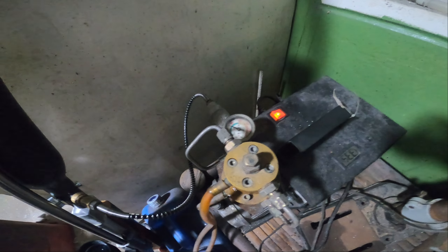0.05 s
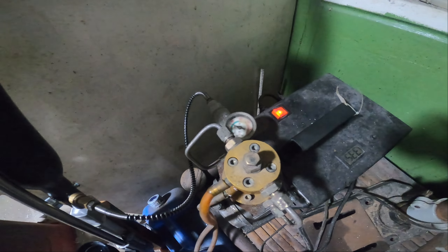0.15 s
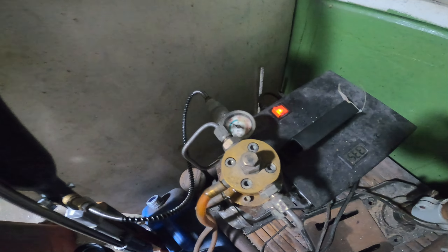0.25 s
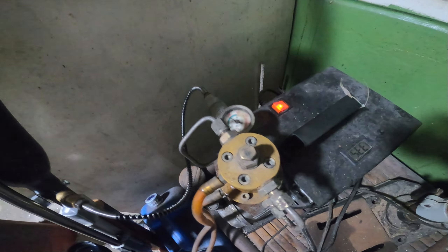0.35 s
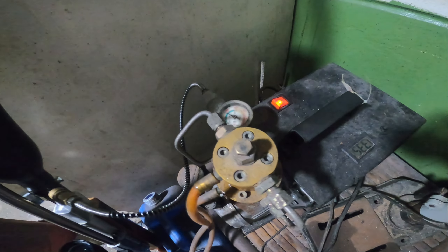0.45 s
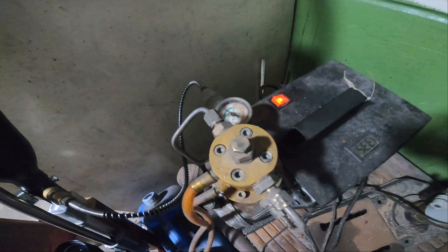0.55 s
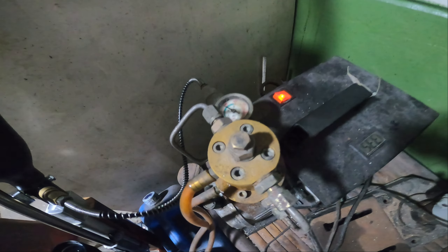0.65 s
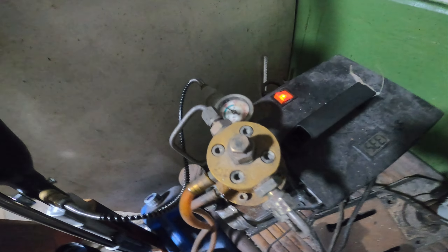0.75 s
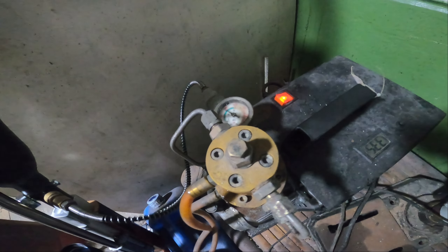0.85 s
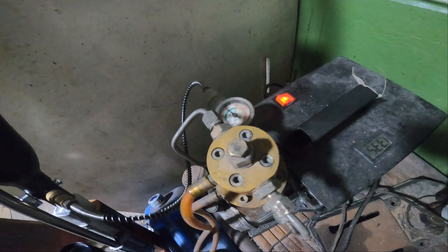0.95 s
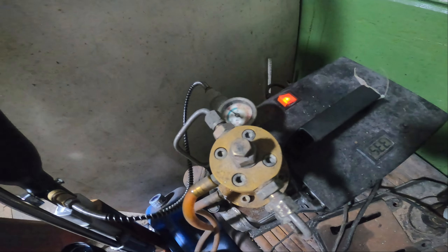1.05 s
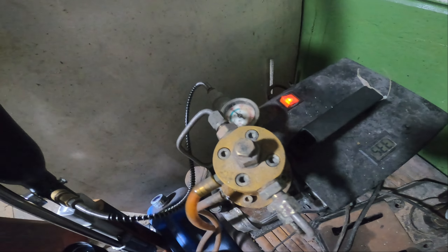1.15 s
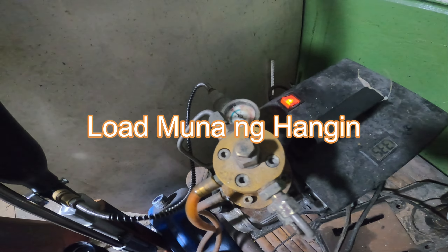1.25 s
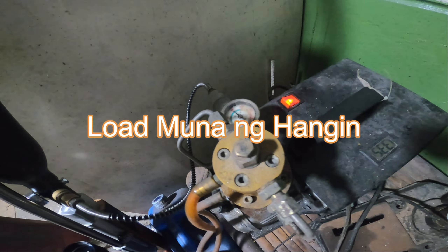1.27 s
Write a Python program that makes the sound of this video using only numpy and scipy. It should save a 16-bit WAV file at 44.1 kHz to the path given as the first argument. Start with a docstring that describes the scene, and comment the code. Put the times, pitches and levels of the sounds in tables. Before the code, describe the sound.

A small high-pressure piston compressor runs steadily up close, a loud droning low hum with rapid mechanical rattle, buzzing and hissing air.

```python
"""A small high-pressure piston compressor pumps steadily, heard from close above in a room corner.
From the start each crank turn gives one air pulse that booms on the fifth harmonic and throbs a little.
A motor hums under it, and every turn brings the same round of piston and valve knocks and hissing air.
Metal parts on the head sing up and fade, some at once and others later, as the pressure builds.
The turning sags slightly and partly recovers; from 4.4 s the boom thins out and leans further right."""
import sys
import numpy as np
from scipy import signal
from scipy.fft import rfft, irfft
from scipy.io import wavfile
from scipy.ndimage import uniform_filter1d, map_coordinates

SR = 44100
rng = np.random.default_rng(int(sys.argv[2]) if len(sys.argv) > 2 else 0)


def transcribe(signal):
    """Save signal, clipped to [-1, 1], as a 16-bit WAV file at the path in sys.argv[1]."""
    frames = np.atleast_2d(signal).T
    limited = np.clip(frames, -1, 1)
    pcm = np.round(limited * 32767).astype(np.int16)
    wavfile.write(sys.argv[1], SR, pcm)


N = 272538
TIME = np.arange(N) / SR   # seconds

# crank speed: time_s, turns_per_s
CRANK_SPEED = [(0.0, 55.374), (0.6, 55.289), (1.2, 55.159), (1.8, 55.025), (2.4, 54.982), (2.9, 54.829),
               (3.4, 54.896), (4.1, 55.079), (5.0, 55.076), (6.18, 55.113)]
# boom, one row per crank harmonic from the first:
# start_db, creep_db_per_s, change_db as the boom gives way, throb_depth (0-1), throb_fade_s
BOOM_HARMONICS = [(-33.5, 0.24, 1.5, 0.03, 1), (-27.5, 0.11, -4.5, 0, 1), (-31, 0.46, 0.5, 0.5, 1.5),
                  (-24, -0.17, -4.5, 0.29, 5), (-13, -0.41, -5.5, 0, 1), (-31.5, 1.19, 1.5, 0.03, 1)]
# buzz of the casing: crank_harmonic, level_db
CASING_BUZZ = [(7, -45.5), (8, -36.5), (9, -31), (10, -34.5), (11, -34), (12, -46), (13, -47.5),
               (14, -37.5), (15, -58), (16, -43.5), (17, -42.5), (18, -38), (19, -39), (20, -41.5),
               (21, -46.5), (22, -34.5), (23, -38.5), (24, -38), (25, -37), (26, -36), (27, -41.5),
               (28, -43.5), (29, -42), (30, -51.5), (31, -39.5), (32, -43), (33, -39), (34, -40.5),
               (35, -43), (36, -58.5), (37, -40.5), (38, -41.5), (39, -44.5), (40, -41.5), (41, -45),
               (42, -42.5), (43, -46.5)]
# piston and valve contacts in one turn: share_of_turn, relative level_db, centre_hz, ring_s
CONTACT_POINTS = [(0.049, -4, 1500, 0.0037), (0.271, 2, 494, 0.004), (0.281, -2.5, 4170, 0.001099),
                  (0.431, 1, 1000, 0.0043), (0.548, -8, 4370, 0.0014), (0.681, -2, 2580, 0.0022),
                  (.935, 7.5, 2235, 0.00058), (0.929, -3, 7470, 0.0017)]
# singing metal parts: pitch_hz, width_hz, loudest_s, swell_s, level_db at the loudest
METAL_RINGS = [(1320, 56, 0.12, 0.77, -29.5), (2475, 36, 6.8, 1.2, -38.5), (2650, 160, 5.2, 0.52, -34.5),
               (3070, 20, .2, 0.33, -36.5), (3168, 35, 3, 2.2, -40.5), (4024, 26, 5.3, 1.6, -40.5),
               (4820, 42, 2.3, 0.61, -41.5), (4870, 45, 5.6, 1.8, -47.5), (5830, 110, 1.1, .5, -50)]
# colour of the rattle and rushing air: band_hz, relative level_db
AIR_COLOUR = [(25, -16), (80, -11), (160, -4.5), (290, 0.5), (420, -4.5), (780, -11.5), (1170, 1.5),
              (1550, -3.5), (2250, -3.5), (3200, -12.5), (4600, -13), (6000, -14), (7100, -15),
              (8900, -30.5), (13000, -39.5)]
# left-right likeness of the rattle and air: band_hz, likeness (1 = the same on both sides)
SIDE_LIKENESS = [(250, 0.97), (550, 1), (1000, .92), (2000, 0.76), (3300, 0.84), (4700, 0.84), (6600, .33),
                 (10000, 0.13)]
# balance of all but the boom and motor: band_hz, left_minus_right_db
SIDE_BALANCE = [(60, -6), (250, 4.5), (560, -2.5), (900, -2.5), (1400, -1.5), (2200, -1), (3300, -0.5),
                (5600, -6), (7600, -1.5), (12000, -1)]
# swing of the knocks, heard relative to its mean: time_s, level_db
KNOCK_LEVEL = [(0.1, -24), (0.52, -23), (2.42, -26.5), (2.89, -24), (4.04, -24.5), (6.02, -24),
               (6.1, -22.5)]
# how the registers of the mechanism swell: centre_hz, rise_db_per_s, share of the knocks' swing
REGISTER_SWELL = [(250, 0.5, 0.77), (520, 0.43, -0.47), (1200, 0.1, 1.4), (2200, 0.05, 0.68),
                  (5000, 0.19, -0.064)]

GIVES_WAY_S, GIVES_WAY_LENGTH_S = 4.4, 1.57   # the boom thins out as the pressure builds
THROB_HZ, THROB_DIP_S = 2.71, 0.37
# boom balance, left minus right: it creeps right, and further as it thins out
BOOM_PAN_DB, BOOM_PAN_DB_PER_S, BOOM_PAN_SHIFT_DB = -2, -0.17, -2
ECHO_LATEST_S, ECHO_DB = 0.006, -13   # echoes off the corner walls and the casing, level of each
LEFT_LAG_S = 0.000045
CUTOFF_HZ = 14500
HALF_EACH_SIDE = np.array([[0.5], [-0.5]])   # shares a balance in dB between left and right


def from_db(db):
    """Decibels to gain."""
    return 10 ** (np.asarray(db) / 20)


def rms_one(x):
    """Scale to unit power."""
    return x / np.sqrt(np.mean(x ** 2) + 1e-20)


def in_time(rows):
    """Each column of a curve at every sample."""
    time_s, *columns = np.transpose(rows)
    return [np.interp(TIME, time_s, column) for column in columns]


def at_hz(points, hz):
    """Read a spectrum on a log-frequency axis."""
    point_hz, values = np.transpose(points)
    return np.interp(np.log(hz), np.log(point_hz), values)


def drift(rate_hz, hop=200, settle=2000):
    """Smooth random wander of spread 1 that changes about rate_hz times a second."""
    pole = np.exp(-2 * np.pi * rate_hz * hop / SR)
    noise = rng.standard_normal(N // hop + settle + 2)
    slow = signal.lfilter([1], [1, -2 * pole, pole * pole], noise)[settle:]
    return np.interp(np.arange(N) / hop, np.arange(len(slow)), rms_one(slow))


def panned(hz):
    """Left and right gain at this frequency."""
    return from_db(at_hz(SIDE_BALANCE, hz) * HALF_EACH_SIDE)


def boom(turn, speed, pulse_at=-0.012, intake_hz=160, intake_q=4.9, cavity_hz=305, cavity_q=7.5):
    """One air pulse a turn: low harmonics, delayed by two air resonances; they throb, then thin out."""
    progress = np.clip((TIME - GIVES_WAY_S) / GIVES_WAY_LENGTH_S, 0, 1)
    thinned = np.sin(np.pi / 2 * progress) ** 2
    throb = -np.cos(2 * np.pi * THROB_HZ * (TIME - THROB_DIP_S))
    pan_db = BOOM_PAN_DB + BOOM_PAN_DB_PER_S * TIME + BOOM_PAN_SHIFT_DB * thinned
    resonances = [(intake_hz, intake_q), (cavity_hz, cavity_q)]
    out = 0
    for k, (start_db, creep_db_per_s, change_db, depth, fade_s) in enumerate(BOOM_HARMONICS, 1):
        hz = k * speed
        lag = sum(np.arctan(q * (hz / f - f / hz)) for f, q in resonances)
        # the longest waves reach both sides alike
        sides_db = pan_db * min(hz / 260, 1) * HALF_EACH_SIDE
        gain = from_db(start_db + creep_db_per_s * TIME + change_db * thinned + sides_db)
        throbbing = 1 + depth * np.exp(-TIME / fade_s) * throb
        out = out - gain * throbbing * np.cos(2 * np.pi * k * (turn - pulse_at) - lag)
    return np.sqrt(2) * out


def motor(turn, hum_db=-49, sideband_db=-46, whine_db=-49):
    """Magnetic pull at multiples of the mains, most tones shifted by multiples of the rotor speed."""
    # hz, rotor multiple, level_db
    tones = [(120, 0, hum_db), (120, 2, hum_db), (120, 3, sideband_db), (480, 1, whine_db)]
    return np.sqrt(2) * sum(from_db(db) * np.sin(2 * np.pi * (hz * TIME + k * turn))
                            for hz, k, db in tones)


def contact_power(hz):
    """How much power each contact puts out at these frequencies: a hump around its centre."""
    _, level_db, centre_hz, _ = np.transpose(CONTACT_POINTS)
    octaves_off = np.log2(np.divide.outer(hz, centre_hz))
    return from_db(level_db) ** 2 * np.exp(-octaves_off ** 2)


def contact_decays(turn, speed, uneven_db):
    """Every contact restarts a decay once a turn, its strength varied by uneven_db."""
    rows = []
    for share, _, _, ring_s in CONTACT_POINTS:
        turns_since = turn - share + 2   # the extra turns keep it positive
        strength = from_db(uneven_db * rng.standard_normal(size=400))
        decay = np.exp(-(turns_since % 1) / speed / ring_s)
        rows.append(strength[turns_since.astype(int)] * decay)
    return np.array(rows)


def work_gain(work, hz):
    """Each register grows with the pressure and answers the swing of the knocks by its own share."""
    centre_hz, rise_db_per_s, follows = np.transpose(REGISTER_SWELL)
    weights = [np.interp(np.log(hz), np.log(centre_hz), column) for column in (rise_db_per_s, follows)]
    return from_db(np.transpose(weights) @ work)


def knock_phases(k, speed, snap=1.1, size=1024):
    """Phase of each crank harmonic: every contact is a sharp impact and then a ringing tail."""
    decays = contact_decays(np.arange(size) / size, speed, 0)
    tails = np.array([rms_one(rfft(decay * rng.standard_normal(size)))[k] for decay in decays]).T
    impacts = np.exp(-2j * np.pi * np.outer(k, np.array(CONTACT_POINTS)[:, 0]))
    strength = np.sqrt(contact_power(k * speed))
    return np.angle(np.sum(strength * (snap * impacts + tails), axis=1))


def buzz(turn, speed, work, top_db=-48, fall_db_per_octave=-12, wander_db=1.06, wander_rad=0.33,
         apart_rad=0.3, jitter_s=0.000015, size=4096, count=32):
    """The knocks come alike on every turn, so the casing answers with a comb of crank harmonics."""
    k = np.arange(7, 140)
    hz = k * speed
    listed_db, last = dict(CASING_BUZZ), CASING_BUZZ[-1][0]
    level_db = np.array([listed_db.get(n, top_db + fall_db_per_octave * np.log2(n / last)) for n in k])

    # the shape of one turn changes slowly as the listener moves, most in its short waves
    loose = np.minimum(hz / 1500, 1.5)[:, None]
    wander = uniform_filter1d(rng.standard_normal((2, len(k), count)), size=7, mode="wrap")
    louder, later = rms_one(wander) * loose
    work_steps = work[:, ::N // count][:, :count]
    gain = from_db(level_db[:, None] + wander_db * louder) * work_gain(work_steps, hz)
    phase = knock_phases(k, speed)[:, None] + wander_rad * later
    apart = apart_rad * loose * rng.standard_normal((2, len(k), 1))   # the sides differ in phase

    harmonics = np.zeros((2, size // 2 + 1, count), complex)
    harmonics[:, k] = panned(hz)[..., None] * gain * np.exp(1j * (phase + apart))
    shapes = irfft(harmonics, axis=1) * size / np.sqrt(2)

    # read the shapes around the crank angle while moving slowly from one to the next
    angle = (turn + jitter_s * speed * drift(40)) % 1
    place = [angle * size, np.linspace(0, count - 1, N)]
    return np.array([map_coordinates(shape, place, order=1, mode="grid-wrap") for shape in shapes])


def corner(sound, count=5):
    """A few early treble echoes a side, which ripple the colour of the hiss."""
    lags = (ECHO_LATEST_S * SR * rng.uniform(0.2, 1, (2, count))).astype(int)
    treble = signal.sosfilt(signal.butter(2, 3000, "high", fs=SR, output="sos"), sound)
    echoes = [sum(np.pad(side, (lag, 0))[:N] for lag in row) for side, row in zip(treble, lags)]
    return sound + from_db(ECHO_DB) * np.array(echoes)


def rattle(turn, speed, work, air_db=-27.5, steady_db=-10, uneven_db=1.5, flutter_db=0.62):
    """Rattle and valve hiss: noise in third octaves that flares at each contact over a steady rush."""
    flares = contact_decays(turn, speed, uneven_db) ** 2
    white = rng.standard_normal((2, 2, N))   # neighbouring bands take turns on two noise pairs
    edges_hz = np.geomspace(20, 16000, 30)
    out = 0
    for k, (low, high) in enumerate(zip(edges_hz, edges_hz[1:])):
        hz = np.sqrt(low * high)
        flare = rms_one(np.sqrt(from_db(steady_db) ** 2 + contact_power(hz) @ flares))
        band = signal.butter(3, [low, high], "band", fs=SR, output="sos")
        mid, side = signal.sosfilt(band, white[k % 2] * flare)
        alike = np.clip(at_hz(SIDE_LIKENESS, hz), -1, 1)
        stereo = np.sqrt(1 + alike) * mid + np.sqrt(1 - alike) * side * [[1], [-1]]
        gain = from_db(at_hz(AIR_COLOUR, hz) + flutter_db * drift(15.0)) * work_gain(work, hz)
        out = out + gain * panned(hz) * stereo
    return from_db(air_db) * rms_one(corner(out))


def singing_metal(turn, struck_at=0.3, uneven=0.2, rub_per_hz=0.0001):
    """The valve's slap keeps modes of the head and pipes ringing; rushing air rubs the broad ones most."""
    slaps = np.diff(np.floor(turn - struck_at), prepend=-1) * (1 + uneven * rng.standard_normal(N))
    out = 0
    for hz, width_hz, loudest_s, swell_s, level_db in METAL_RINGS:
        pole = np.exp(-np.pi * width_hz / SR)
        drive = slaps + rub_per_hz * width_hz * rng.standard_normal((2, N))
        feedback = [1, -2 * pole * np.cos(2 * np.pi * hz / SR), pole * pole]
        ring = signal.lfilter([1, 0, -1], feedback, drive)
        swell = np.exp(-0.5 * ((TIME - loudest_s) / swell_s) ** 2)
        out = out + panned(hz) * from_db(level_db) * swell * rms_one(ring)
    return out


def scene():
    """The crank angle drives every layer; the machine stands a little to the right."""
    speed, = in_time(CRANK_SPEED)
    turn = np.cumsum(speed) / SR + 0.02
    mean_speed = speed.mean()
    knocks_db, = in_time(KNOCK_LEVEL)
    # pumping time (s) and swing of the knocks (dB), each about its mean
    work = np.array([TIME - TIME.mean(), knocks_db - knocks_db.mean()])
    left, right = (boom(turn, mean_speed) + motor(turn) + buzz(turn, mean_speed, work)
                   + rattle(turn, mean_speed, work) + singing_metal(turn))
    late = round(LEFT_LAG_S * SR)
    return np.array([np.pad(left, (late, 0), mode="edge")[:N], right])


def record(dry):
    """A steep low-pass cuts the top."""
    return signal.sosfilt(signal.butter(14, CUTOFF_HZ, fs=SR, output="sos"), dry)


dry = scene()
out = record(dry)
transcribe(out)
```